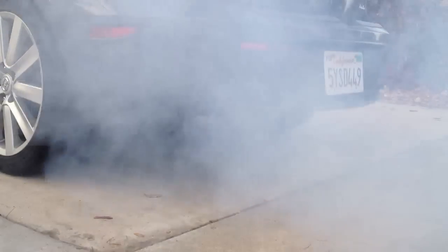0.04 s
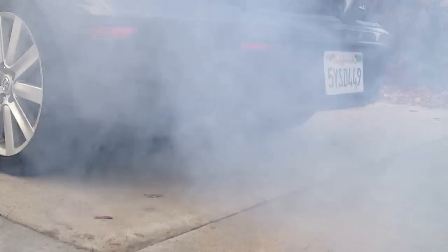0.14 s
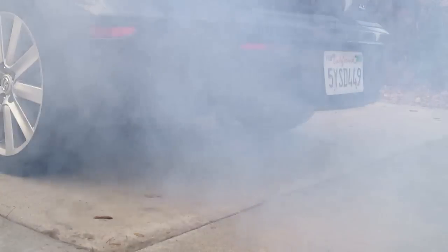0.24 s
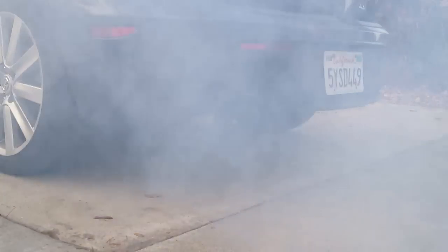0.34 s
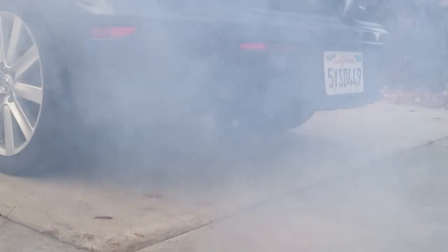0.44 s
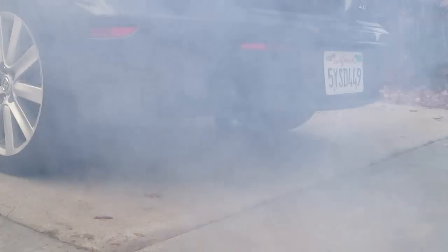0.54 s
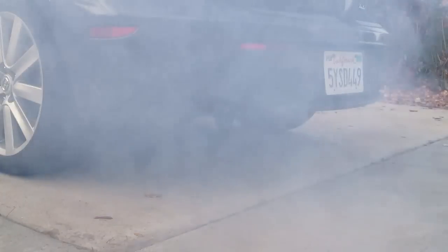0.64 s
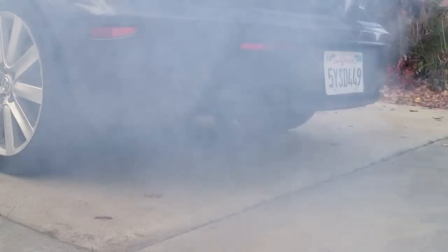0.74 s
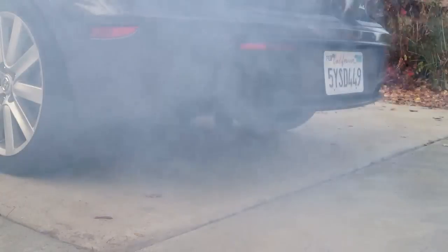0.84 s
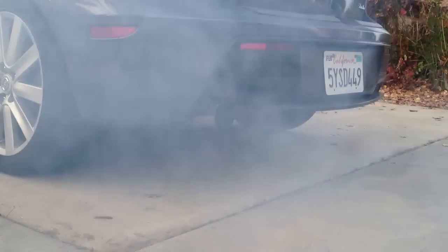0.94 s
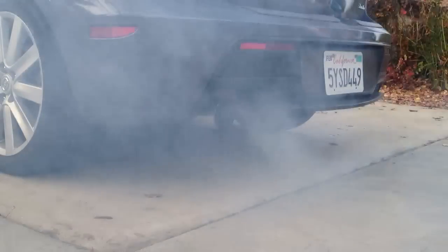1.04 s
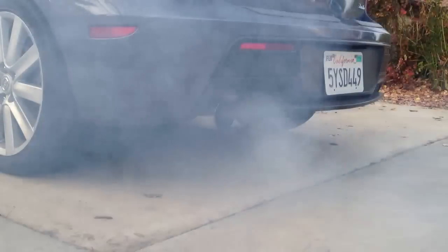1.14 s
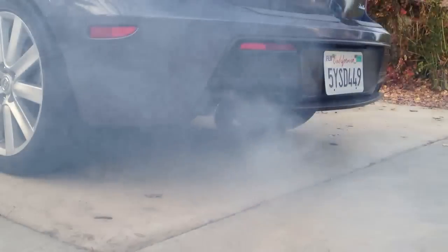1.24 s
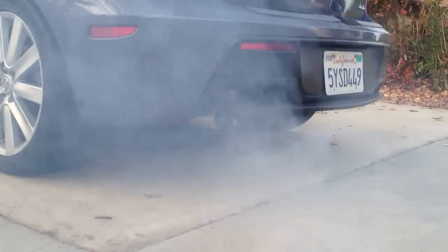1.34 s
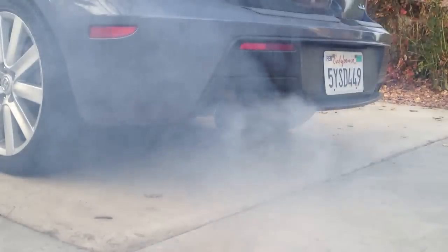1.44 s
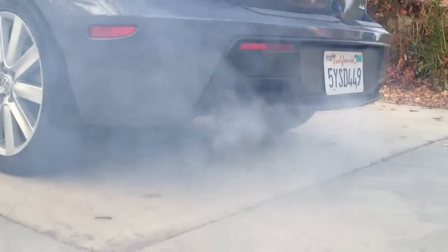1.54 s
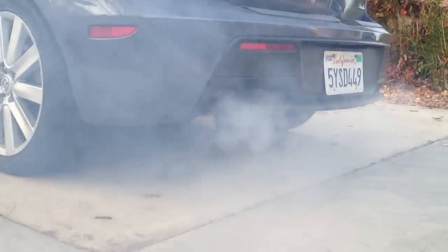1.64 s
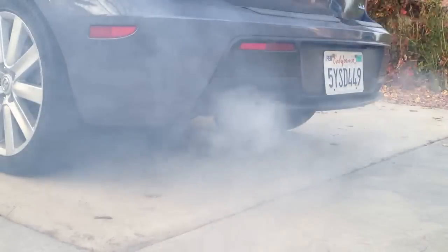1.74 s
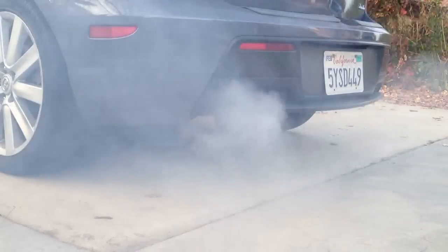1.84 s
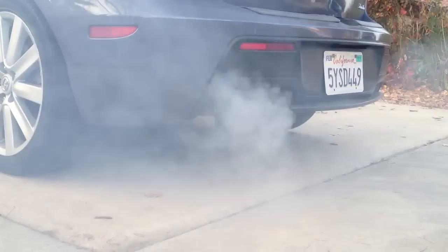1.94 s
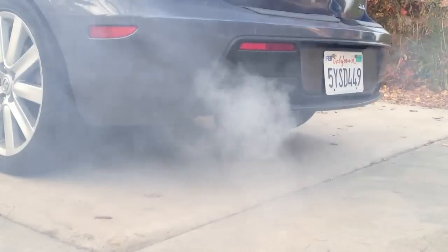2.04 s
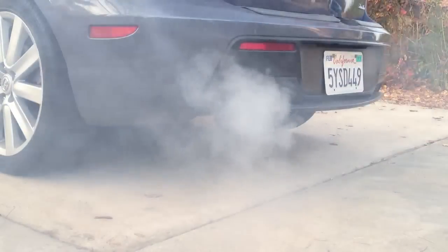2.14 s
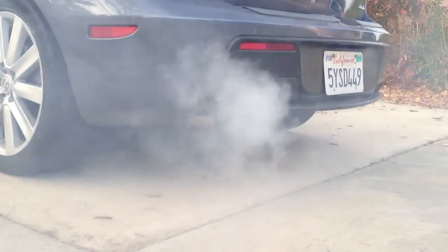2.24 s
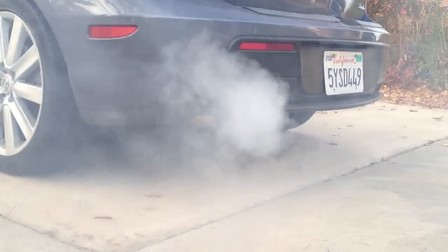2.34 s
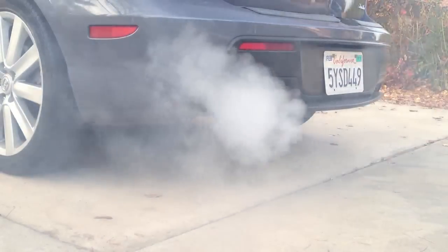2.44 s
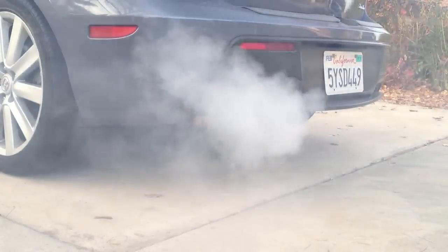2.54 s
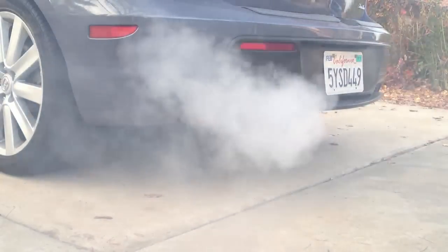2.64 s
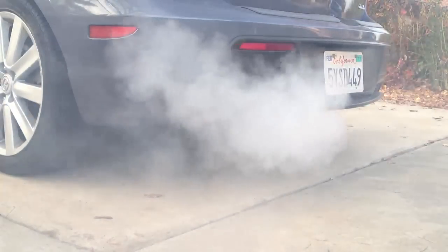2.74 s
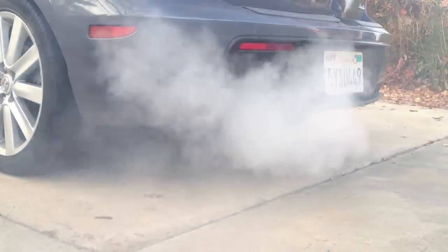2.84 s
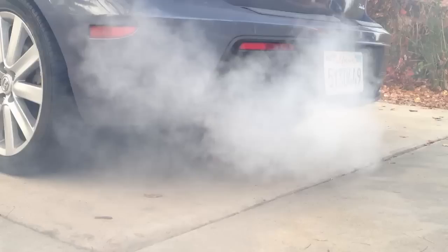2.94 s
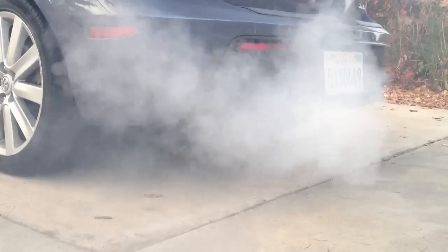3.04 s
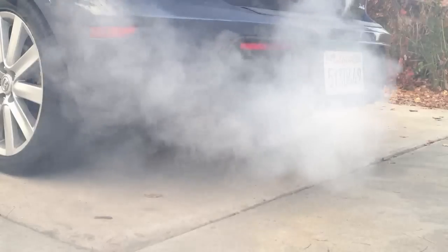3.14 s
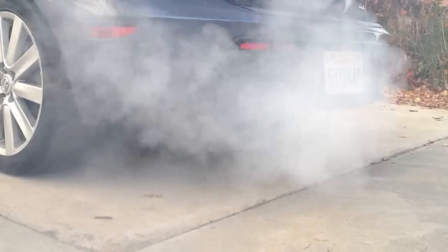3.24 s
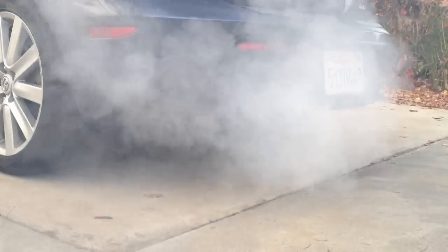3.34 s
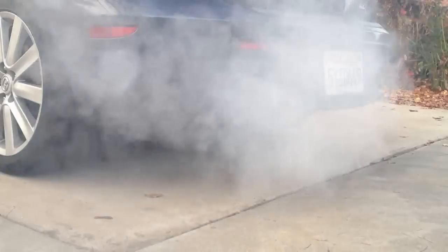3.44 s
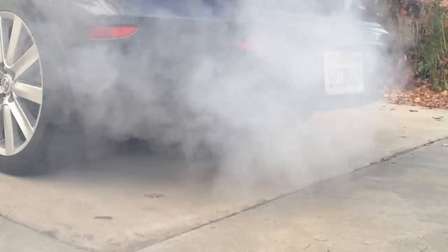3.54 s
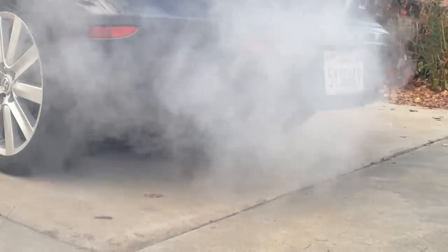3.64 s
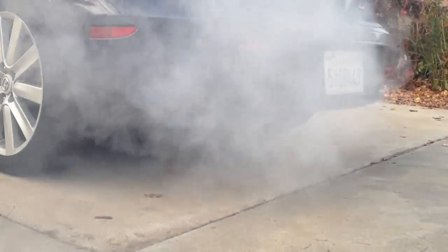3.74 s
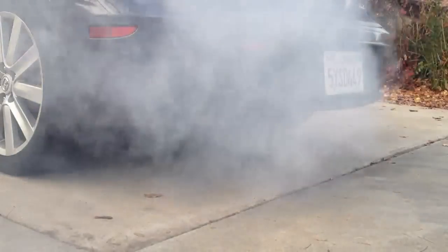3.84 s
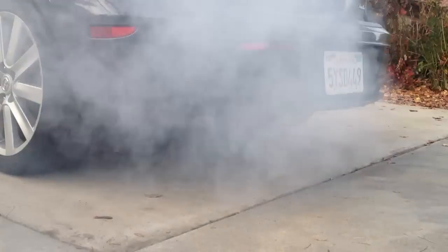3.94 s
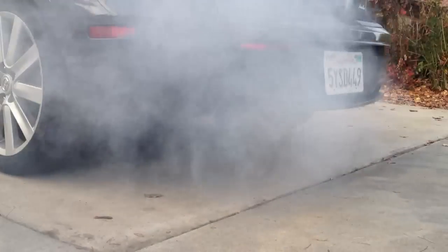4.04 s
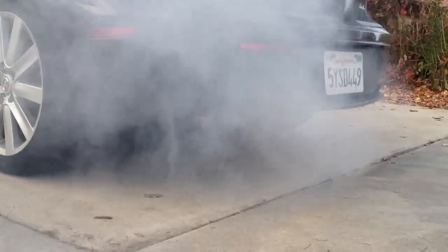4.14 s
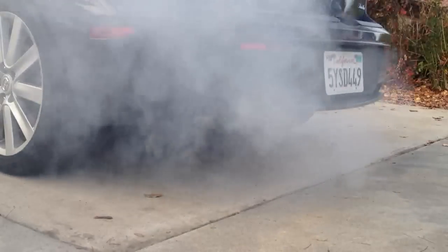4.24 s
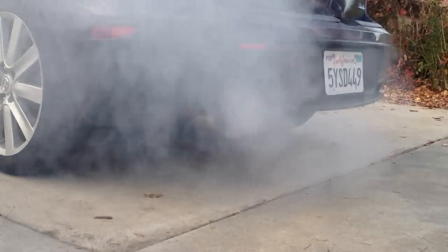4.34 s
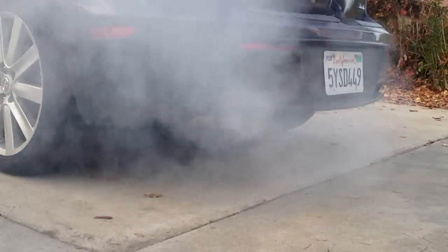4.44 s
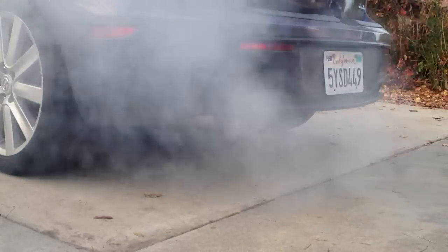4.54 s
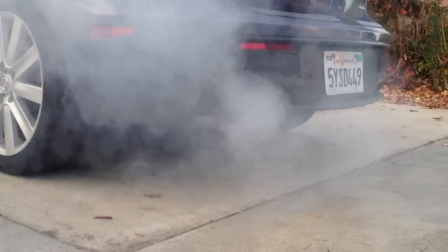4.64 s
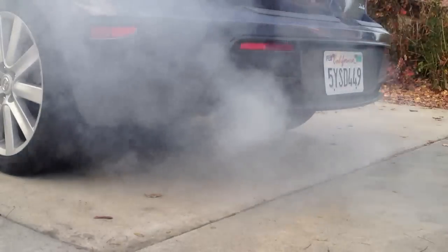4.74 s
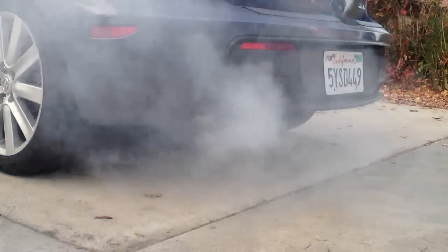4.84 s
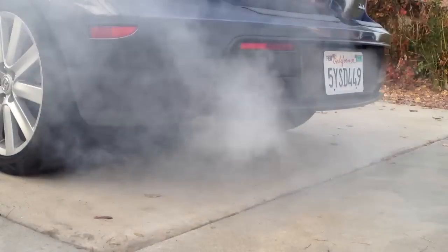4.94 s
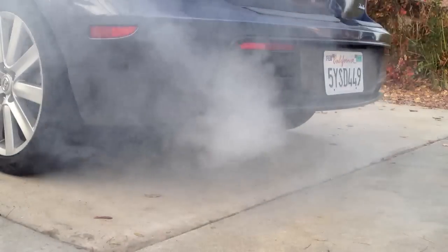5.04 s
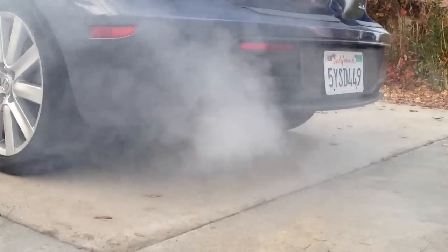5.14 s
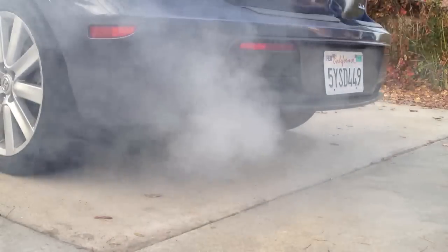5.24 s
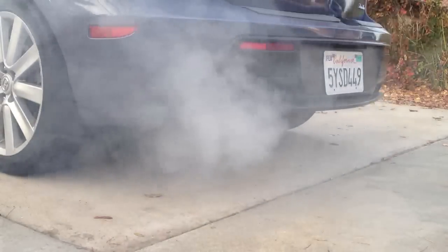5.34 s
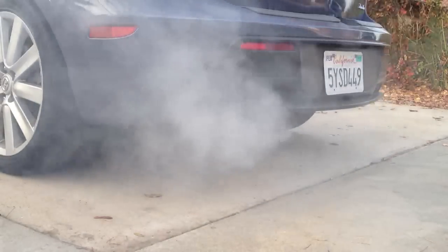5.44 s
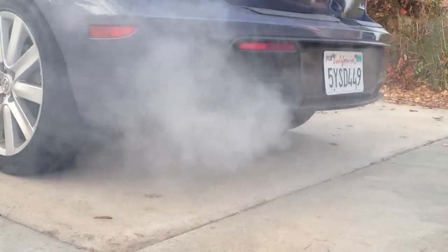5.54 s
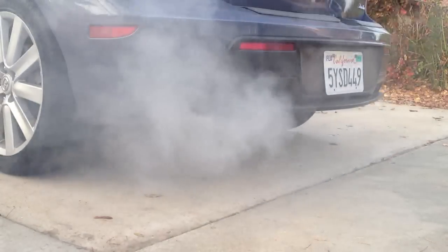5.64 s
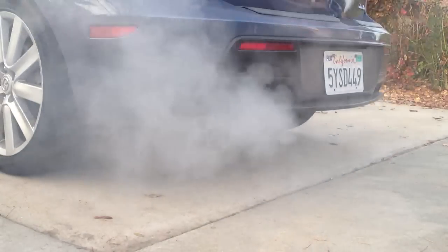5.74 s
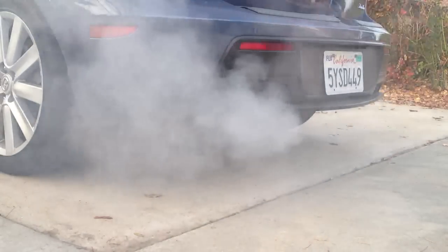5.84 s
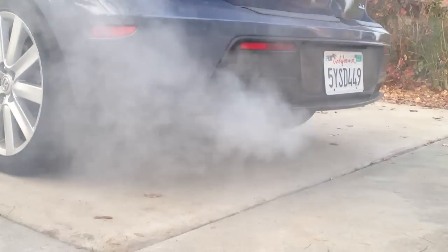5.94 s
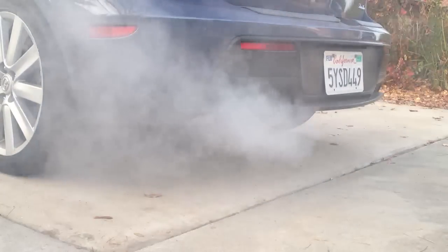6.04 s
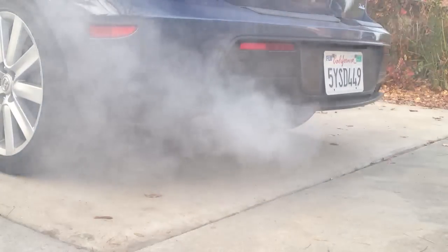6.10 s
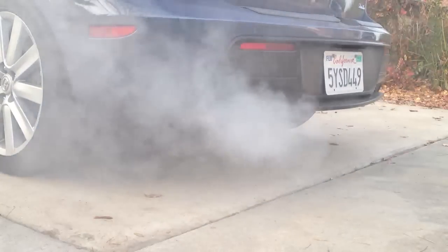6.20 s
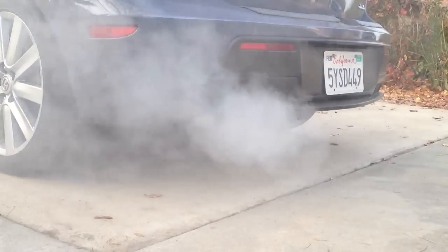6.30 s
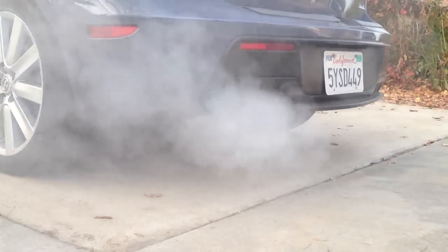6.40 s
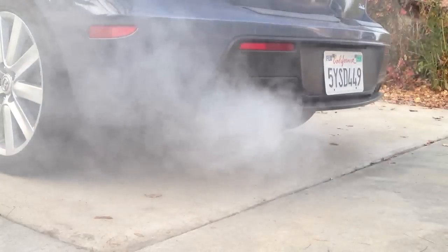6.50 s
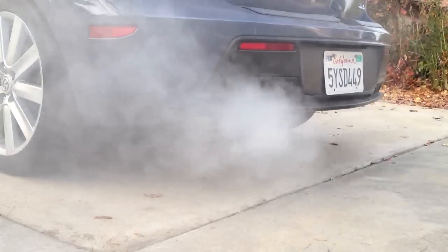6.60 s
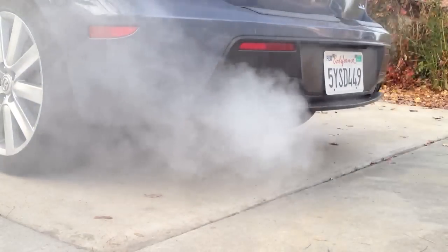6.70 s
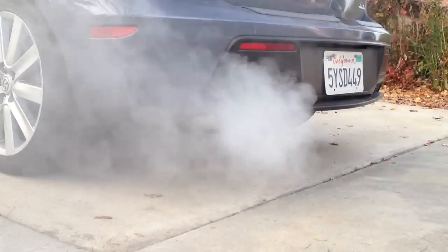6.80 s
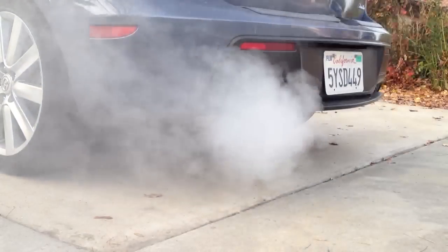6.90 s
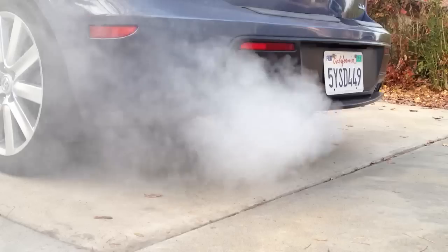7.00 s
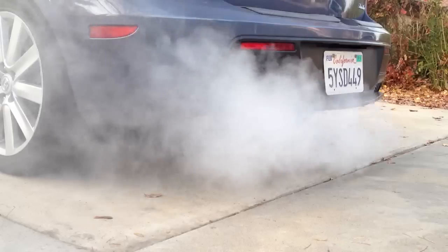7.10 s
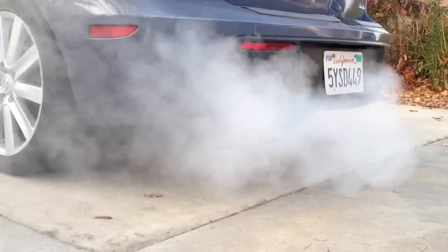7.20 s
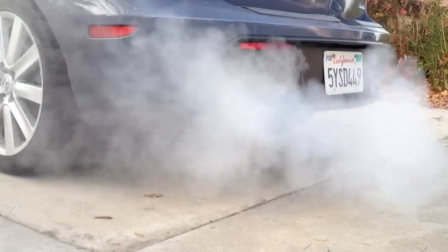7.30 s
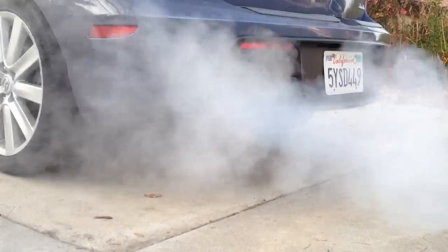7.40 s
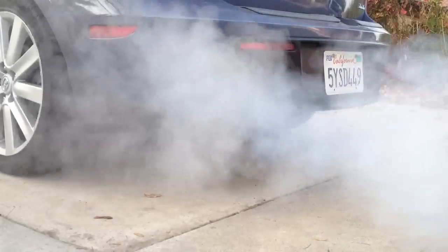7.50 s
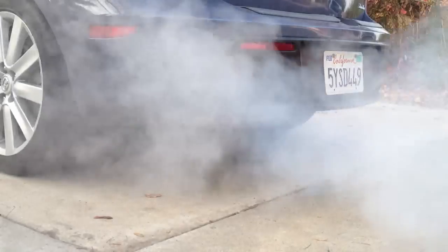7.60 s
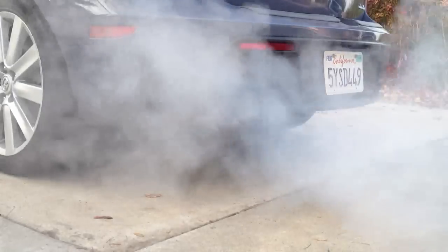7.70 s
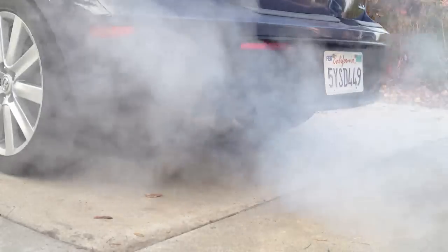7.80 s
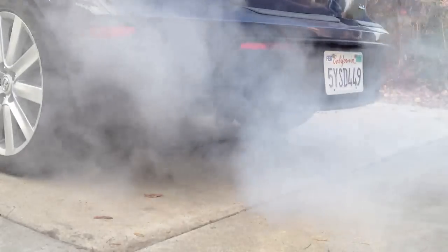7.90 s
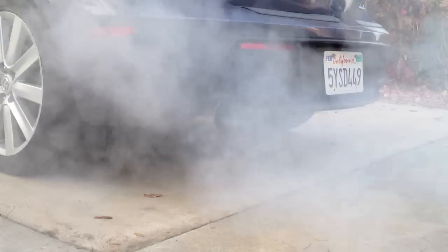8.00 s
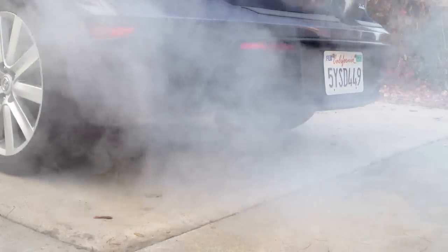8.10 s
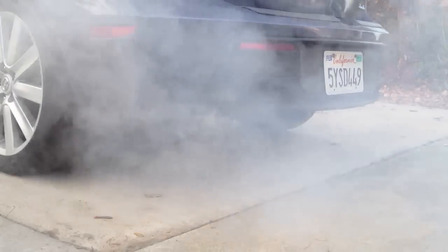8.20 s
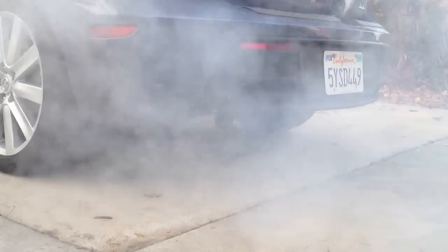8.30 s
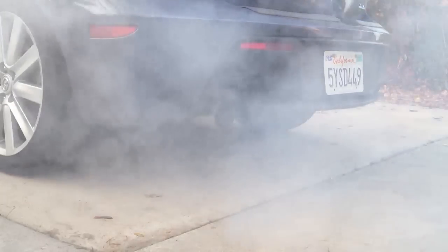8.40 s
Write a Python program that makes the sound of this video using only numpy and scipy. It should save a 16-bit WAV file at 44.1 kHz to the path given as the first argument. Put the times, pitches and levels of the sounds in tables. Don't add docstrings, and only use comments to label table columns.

```python
import sys
import numpy as np
from scipy import signal
from scipy.fft import rfft, irfft, next_fast_len
from scipy.io import wavfile
from scipy.ndimage import uniform_filter1d, map_coordinates

SR = 44100
rng = np.random.default_rng(int(sys.argv[2]) if len(sys.argv) > 2 else 0)


def master(y):
    cut = np.clip(np.atleast_2d(y).T, -1, 1)
    pcm = np.round(cut * 32767)
    wavfile.write(sys.argv[1], SR, pcm.astype(np.int16))


def volts_from_db(level):
    exponent = np.asarray(level, float) / 20
    return 10 ** exponent


N = 373086
T = np.arange(N) / SR
MID_HZ = 58
SHUT_S = 0.076

# time in seconds, thump level in dB.
EFFORT = [(0, -23.5), (1.2, -27.5), (1.45, -29.5), (1.62, -36.5), (2.07, -32), (2.28, -35.5), (2.42, -23),
          (2.82, -21.5), (3.0, -26.5), (3.65, -31.5), (4.1, -37.5), (4.3, -31.5), (4.75, -33.5),
          (4.9, -40.5), (6.39, -37), (6.95, -18.5), (7.3, -17.5), (7.52, -22.5)]
# lift in seconds, catch in seconds,
# strength of coasting in dB, burble in dB, time the rasp takes to build in seconds.
LIFTS = [
    (-.08, 1.47, 0.5, 9, 0.19),
    (2.882, 3.9, 0.5, 3, 0.53),
    (7.439, 9, -1, 13, 0.13),
]
LIFT_S, CAUGHT_S, COASTING_DB, BURBLE_DB, RASP_RISE_S = np.transpose(LIFTS)


def unit(x):
    return x / np.sqrt(np.mean(x ** 2) + 1e-20)


def gain(points):
    f, db = np.transpose(points)
    hz = np.fft.rfftfreq(next_fast_len(N + SR, True), 1 / SR)
    return volts_from_db(np.interp(np.log(hz + 1), np.log(f + 1), db))


def coloured(x, points):
    cep = irfft(np.log(gain(points) + 1e-6))
    half = len(cep) // 2
    cep[1:half] *= 2
    cep[half + 1:] = 0
    return irfft(rfft(x, len(cep)) * np.exp(rfft(cep)))[:N]


def band(hz, width):
    skirts = [(hz - 6 * width, -60), (hz - width, -6), (hz, 0), (hz + width, -6), (hz + 6 * width, -60)]
    return unit(coloured(rng.standard_normal(N), skirts))


def rung(x, hz, width, db):
    return volts_from_db(db) * np.sqrt(300 / width) * signal.lfilter(*signal.iirpeak(hz, hz / width, SR), x)


def wobble(rate):
    knots = rng.standard_normal(int(N * rate / SR) + 4)
    return map_coordinates(knots, [np.arange(N) * rate / SR])


def curve(rows):
    s, value = np.transpose(rows)
    return np.interp(T, s, value)


def coasting(rises_s, sizes):
    total = np.zeros(N)
    for lift, caught, rise_s, size in zip(LIFT_S, CAUGHT_S, np.resize(rises_s, len(LIFTS)), sizes):
        rise = (T - lift) / rise_s
        fall = (caught - T) / 0.02 + 1
        total += size * np.clip(np.minimum(rise, fall), 0, 1)
    return total


def controls():
    # time in seconds, firings in Hz.
    speed = [(0, 78.14), (1.24, 40.32), (1.58, 34.62), (1.77, 36.14), (2.22, 36.54), (2.39, 38.54),
             (2.89, 58.59), (3.16, 56.94), (3.79, 38.1), (4.15, 35.21), (4.77, 29.15), (6.11, 27.98),
             (6.53, 30.93), (6.87, 41.12), (7.25, 69.6), (7.47, 77.2), (7.81, 71.58), (8.46, 52.47)]
    hz = curve(speed)
    count = -.07 + np.cumsum(hz) / SR
    effort_db = curve(EFFORT)
    fired = volts_from_db(-51.5 + 1.886 * (effort_db + 31))
    coast_db = -29 + 15 * np.log2(hz / MID_HZ)
    coast = coasting(RASP_RISE_S, volts_from_db(COASTING_DB)) * volts_from_db(coast_db)
    gulp_db = sum(-16.5 * np.exp(-((T - lift) / 0.033) ** 2) for lift in LIFT_S)
    return count, hz, effort_db + gulp_db, 20 * np.log10(np.hypot(fired, coast))


def street():
    # frequency in Hz, level in dB per Hz.
    street_colour = [(15, -91), (40, -40), (60, -19), (109, -2), (167, -15), (213, -10), (271, -23),
                     (415, -14), (903, -22), (978, -17.5), (1500, -30.5), (2430, -29), (3180, -42.5),
                     (15000, -46)]
    return volts_from_db(-48 + 0.067 * wobble(4.32)) * unit(coloured(rng.standard_normal(N), street_colour))


def gurgle(life=0.032, rise=1.45):
    # start in seconds, peak in dB, start pitch in Hz.
    bubbles = [
        (4.251, -45, 412),
        (4.385, -44, 372),
        (4.511, -43, 354),
        (4.64, -43.5, 371),
        (4.773, -47, 397),
        (4.899, -53, 407),
        (5.031, -48, 408),
        (5.16, -51, 400),
        (5.43, -49, 401),
        (5.85, -51, 403),
    ]
    out = np.zeros(N)
    age = np.arange(round(life * SR)) / (life * SR)
    for s, db, hz in bubbles:
        glide = hz * (1 + (rise - 1) * volts_from_db(min(db + 40.0, 0)) * age ** 2)
        tone = np.sin(2 * np.pi * np.cumsum(glide) / SR)
        out[round(s * SR):][:len(age)] += volts_from_db(db) * np.sin(np.pi * age) ** 0.26 * tone
    return out


def machinery(count, hz):
    # frequency in Hz, level in dB per Hz.
    hiss_colour = [(470, -10.5), (800, -5.5), (950, -3.5), (1160, -6.5), (1270, -5.5), (1910, -8.5),
                   (2570, -13), (3120, -13.5), (4200, -16.5), (4650, -16), (5100, -22.5), (7700, -22.5),
                   (10000, -29), (15000, -28.5)]
    # pitch in Hz, width in Hz, level in dB.
    whines = [
        (12150, 310, -26.5),
        (987, 34, -18),
        (2940, 19, -21.5),
    ]
    level_db = -48.5 + 10.5 * np.log2(hz / MID_HZ) + 0.078 * (curve(EFFORT) + 30)
    level_db += 2.5 * np.exp(-((T - 7.96) / 0.02) ** 2)
    firing = np.cos(2 * np.pi * count)
    cycle = np.cos(np.pi * count / 2)
    low = rng.standard_normal(N) * volts_from_db(0.26 * wobble(12.0))
    high = rng.standard_normal(N) * volts_from_db(1.4 * wobble(28) + 0.56 * cycle + 0.81 * firing)
    low = signal.sosfilt(signal.butter(2, 6000, "low", fs=SR, output="sos"), low)
    high = signal.sosfilt(signal.butter(2, 6000, "high", fs=SR, output="sos"), high)
    flow = unit(coloured((1 + 0.041 * firing) * (low + high), hiss_colour))
    flow += sum(volts_from_db(db) * band(f, width) for f, width, db in whines)
    gate = np.exp(-((count - 2.4) % 4) / .2)
    injector = unit(gate * volts_from_db(4 * wobble(5)) * band(10600, 500))
    return volts_from_db(level_db + 3) * flow + volts_from_db(-90) * injector


def shield(count, rasp_db):
    # time in seconds, pitch in Hz.
    sheet_pitch = [(0, 2470), (6.5, 2557), (6.9, 2210), (7.2, 2450), (7.5, 2543), (8.46, 2477)]
    # time in seconds, boost in dB, length in seconds.
    rattles = [
        (3.26, 5, .08),
        (7.18, 9, 0.039),
    ]
    # start in seconds, peak in dB, pitch in Hz.
    ticks = [
        (4.6528, -30, 4130),
        (7.947, -46, 4310),
        (8.043, -48, 4050),
    ]
    chatter_db = sum(db * np.exp(-((T - s) / lasts) ** 2) for s, db, lasts in rattles)
    level_db = -53.5 + 0.6 * (rasp_db + 27.5) + chatter_db
    shake = np.exp(1.17 * np.cos(2 * np.pi * (count + 0.15)) + 0.31 * wobble(25))
    narrow = coloured(rng.standard_normal(N), [(0, 15.5), (70, 6), (350, 3.5), (2000, -80)])
    ring = np.cos(2 * np.pi * np.cumsum(curve(sheet_pitch)) / SR)
    buzz = volts_from_db(level_db + 1.5) * unit(np.sqrt(shake) * narrow * ring)
    t = np.arange(400) / SR
    for s, db, hz in ticks:
        fade = volts_from_db(db - 60 * t / 0.0033) * (1 - np.exp(-t / 0.00037))
        buzz[round(s * SR):][:len(t)] += fade * np.sin(2 * np.pi * hz * t)
    return buzz


def drone(count, hz):
    # firings in Hz, level at the firing rate in dB, level at twice that rate in dB.
    hum = [(28.4, -80, -74), (38, -82, -36.5), (49, -63, -31), (55.3, -48.5, -28), (64.8, -29, -23.5),
           (66.4, -37, -32.5), (71, -26.5, -28.5), (79, -30.5, -25.5)]
    outlet_orders = [4, 5, 6.5, 6.75]
    outlet_levels = [-8.5, -11.5, -32, -5]
    speeds, first, second = np.transpose(hum)
    muted_db = -7
    state_db = muted_db + coasting(SHUT_S, COASTING_DB - muted_db)
    first_db = state_db + np.interp(hz, speeds, first)
    second_db = state_db + np.interp(hz, speeds, second)
    orders = [(1, first_db), (2, second_db)]
    orders += [(k, first_db + db) for k, db in zip(outlet_orders, outlet_levels)]
    total = np.zeros(N)
    for k, db in orders:
        total += volts_from_db(db + .8 * wobble(12)) * np.sin(2 * np.pi * k * count + .1 * wobble(15))
    return -np.sqrt(2) * total


def uneven(hz):
    falling = np.clip(-np.gradient(hz) * SR / 9, 0, 1)
    sag = uniform_filter1d(falling, SR // 10)
    scatter_db = 1 + 2 * sag * np.clip((85 - hz) / 40, 0, 1)
    return scatter_db, hz / 70 * coasting(SHUT_S, BURBLE_DB)


def firings(count, hz, thump_db, rasp_db):
    # time in seconds, peak in dB, crack in dB against the peak.
    pops = [(1.22, -40.5, 12), (1.32, -13, -17), (1.403, -30, -1), (1.425, -5, -16), (1.453, -12.5, -18),
            (1.508, -14.5, -19), (3.58, -18, -8.5), (3.648, -17, -9), (3.673, -15, -13), (3.77, -12.5, -19),
            (3.848, -15, -18), (3.88, -14.5, -20), (3.959, -18, -20), (3.989, -21, -21),
            (4.182, -18.5, -16), (4.211, -15.5, -28), (4.267, -16, -31), (4.298, -10.5, -16.5),
            (4.809, -17.5, -36)]
    cylinders = [1.5, 0.95, 0.6, -0.5]
    at = np.flatnonzero(np.diff(np.floor(count)))
    chance = rng.standard_normal((len(at), 3))
    travel = round(.009 * SR)
    jitter = (.004 * chance[:, 0] * SR / hz[at]).astype(int)
    at = np.clip(at - travel + jitter, 0, N - 1)
    scatter_db, burble_db = (c[at] for c in uneven(hz))

    def turn(pattern):
        return np.resize(pattern, len(at))

    even = np.sqrt(SR / hz[at])
    thump_burble = burble_db * turn([-0.73, -0.28, -1.78, -1.15])
    rasp_burble = burble_db * turn([-0.68, -0.33, -0.68, 0.16])
    cylinder_db = turn(cylinders) * hz[at] / 40
    thump = even * volts_from_db(thump_db[at] + cylinder_db + thump_burble + scatter_db * chance[:, 1])
    rasp = even * volts_from_db(rasp_db[at] + rasp_burble + 1.75 * chance[:, 2])
    front = rasp.copy()
    for s, db, crack_db in pops:
        k = np.argmin(abs(at - s * SR))
        at[k] = (s + 0.00065) * SR
        thump[k] = volts_from_db(db + 19.0)
        rasp[k] = volts_from_db(db + crack_db + 20.0)
        front[k] = -volts_from_db(db + crack_db + 29.5)
    return at, thump, rasp, front


def bursts(at, size, ring, memory):
    t = np.arange(2048) / SR
    fresh = rng.standard_normal((len(at) + 40, len(t)))
    shape = signal.lfilter([np.sqrt(1 - memory ** 2)], [1, 0, 0, 0, -memory], fresh, axis=0)[-len(at):]
    fade = (1 - np.exp(-t / 0.0018)) * np.exp(-t / ring) / np.sqrt(ring * SR / 2)
    rows = shape * fade
    heard = signal.sosfilt(signal.butter(2, [400, 620], "band", fs=SR, output="sos"), rows)
    power = np.sum(heard ** 2, axis=1)
    rows = size[:, None] * rows * (power.mean() / power)[:, None] ** .4
    return np.bincount((at[:, None] + np.arange(len(t))).ravel(), rows.ravel())[:N]


def train(at, size):
    return np.bincount(at, size, N)


def colour_size(points):
    return np.linalg.norm(coloured(np.eye(1, N)[0], points))


def silencer(at, thump, thump_db):
    # frequency in Hz, level in dB.
    silencer_colour = [(24, -4), (36, -63), (56, -20), (73, -18), (97, 0.5), (151, 6.5), (209, 4.5),
                       (235, -16.5), (295, -19.5), (335, -21), (420, -22.5), (480, -41.5), (700, -120)]
    # pitch in Hz, width in Hz, level in dB.
    chamber = (289, 23, -23.5)
    body = coloured(train(at, thump), silencer_colour) / colour_size(silencer_colour)
    strain = np.clip((thump_db + 32) / 10, 0, 1)
    return body + rung(body, *chamber) * 10 * strain


def tailpipe(at, rasp, front):
    # frequency in Hz, level in dB.
    rasp_colour = [(140, -46), (240, 0), (280, -4.5), (330, -13), (388, -7), (430, -1), (465, -3.5),
                   (511, -7.5), (550, -4), (600, -6), (678, -11), (863, -16), (1150, -31.5), (2860, -120)]
    # pitch in Hz, width in Hz, level in dB, growth while coasting.
    pipe_rings = [
        (520, 28, 1, 1),
        (450, 40, -4, -.3),
    ]
    gas = bursts(at, rasp, ring=.0085, memory=.88)
    pipe = coloured(gas + 0.27 * train(at, front), rasp_colour) / colour_size(rasp_colour)
    coast = coasting(SHUT_S, np.ones(len(LIFTS)))
    out = .6 * pipe
    for hz, width, db, grows in pipe_rings:
        out += (0.36 + grows * coast / 2) * rung(pipe, hz, width, db)
    return out


def exhaust(count, hz, thump_db, rasp_db):
    at, thump, rasp, front = firings(count, hz, thump_db, rasp_db)
    return silencer(at, thump, thump_db) + tailpipe(at, rasp, front)


def scene():
    count, hz, thump_db, rasp_db = controls()
    quiet = street() + gurgle() + machinery(count, hz) + shield(count, rasp_db)
    return (quiet + drone(count, hz) + exhaust(count, hz, thump_db, rasp_db))[None]


def band_limit(x):
    return signal.sosfilt(signal.butter(12, 15200, fs=SR, output="sos"), x)


def record(dry):
    hz = np.fft.rfftfreq(N, 1 / SR)
    mix = irfft(rfft(dry) * (hz < 15250) * (hz > 10), N)
    return band_limit(mix)


dry = scene()
out = record(dry)
master(out)
```